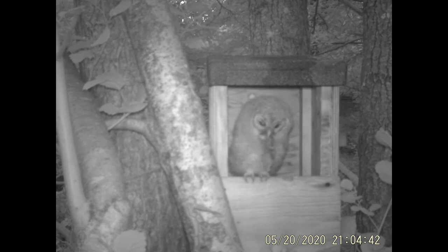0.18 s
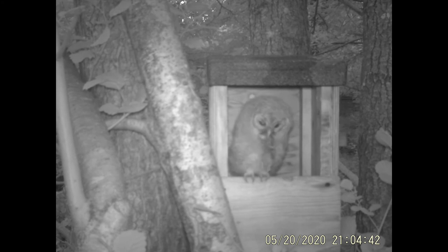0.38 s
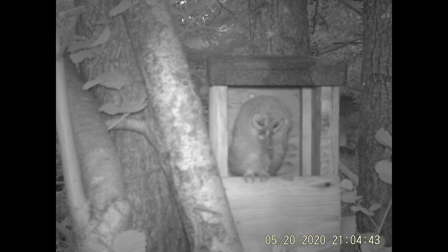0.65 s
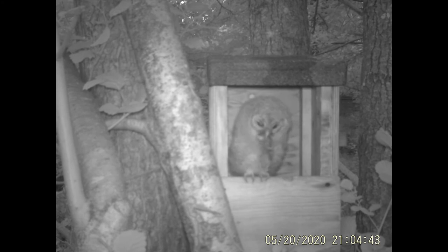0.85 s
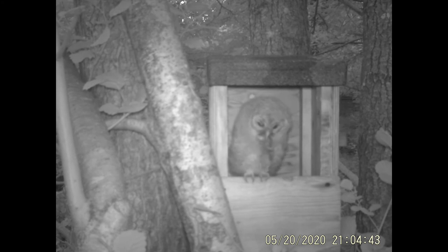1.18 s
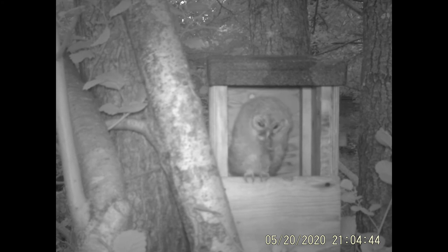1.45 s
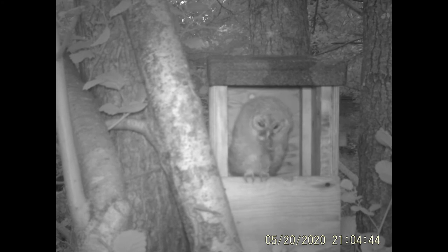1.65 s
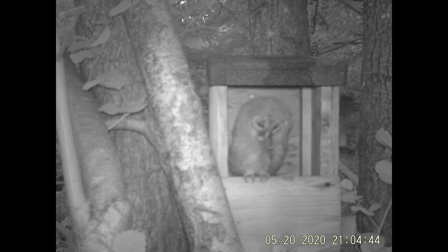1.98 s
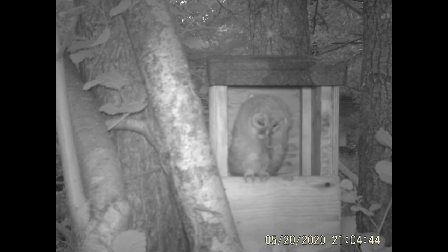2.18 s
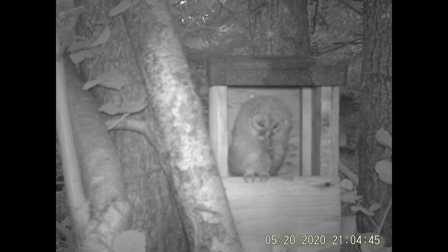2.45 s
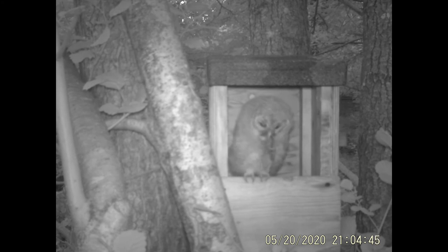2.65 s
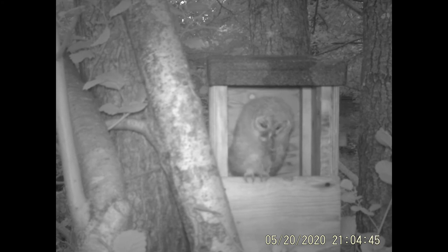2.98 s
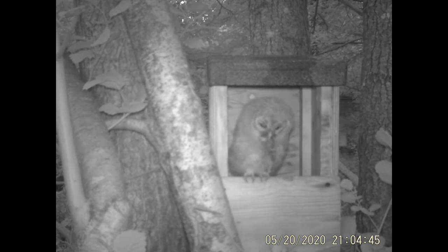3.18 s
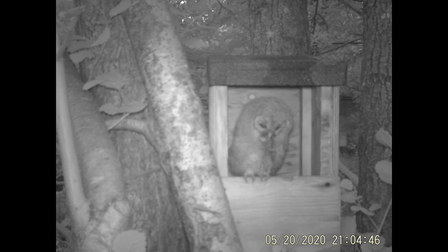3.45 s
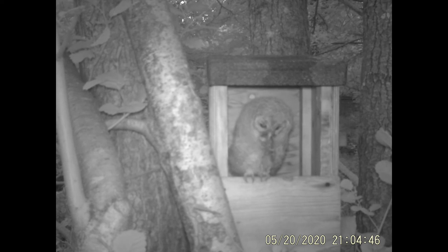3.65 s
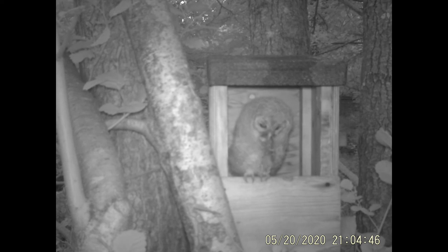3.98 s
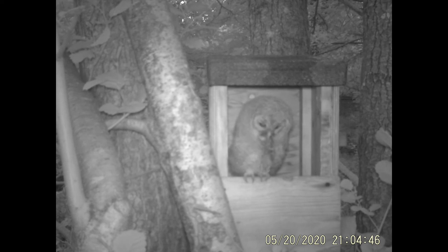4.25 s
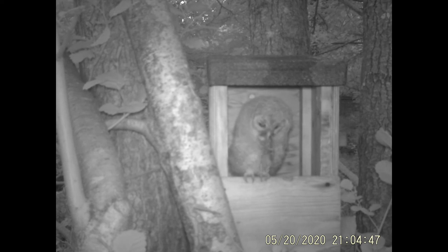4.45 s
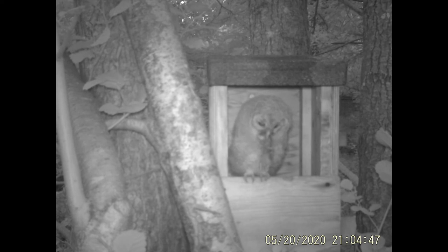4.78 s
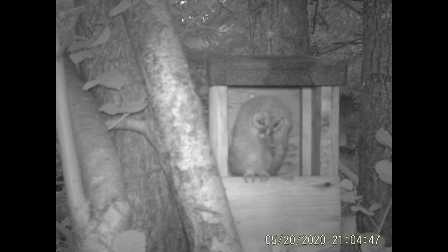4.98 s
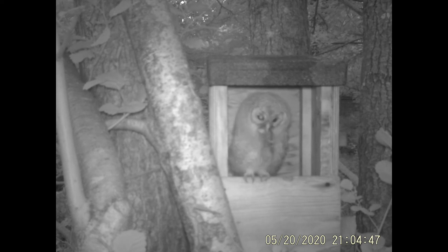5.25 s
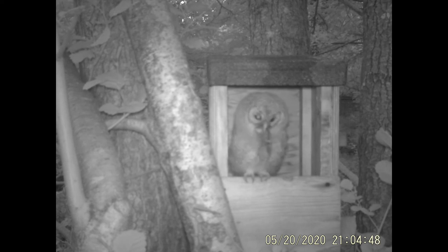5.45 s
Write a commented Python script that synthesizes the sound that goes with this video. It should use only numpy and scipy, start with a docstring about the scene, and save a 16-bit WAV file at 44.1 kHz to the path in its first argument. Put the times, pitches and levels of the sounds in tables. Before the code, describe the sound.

An owl chick begs from a hollow wooden nest box, its shrill, breathy whistles rising, diving and falling into rasp. Four brief calls are spread out by long gaps, some preceded by small squeaks, with low croaky catches in the first and last. Thin distant birdsong follows the first call. A slight woodland echo and constant noisy hiss surround everything, identical on both sides.

```python
"""Night in a wood: steady microphone hiss throughout, the same in both channels.
From the start an owl chick begs in a wooden nest box: short wheezes and squeaks lead into long calls.
Each call is a fluttering whistle, a tone frayed by noise, swooping over rasping filtered noise.
Low notes catch in the first and last calls; after the first, songbirds slide faintly far off.
Resonances and reflections make the box; a diffuse tail makes the wood."""
import sys
import numpy as np
from scipy import signal
from scipy.fft import rfft, irfft, next_fast_len
from scipy.io import wavfile

SR = 44100
rng = np.random.default_rng(int(sys.argv[2]) if len(sys.argv) > 2 else 0)


def pcm_store(signal):
    """Save signal as 16-bit PCM."""
    levels = np.round(np.clip(np.atleast_2d(signal), -1, 1) * 32767)
    wavfile.write(sys.argv[1], SR, levels.astype(np.int16).T)


N = 247401
TIME_S = np.arange(N) / SR

# Microphone hiss spectrum. Each row: frequency in Hz, relative density in dB.
HISS_SPECTRUM = [(15, -15.5), (30, -15.5), (60, -18.5), (120, -21.5), (300, -25), (700, -28.5), (1400, -31),
                 (3000, -34.5), (6000, -37.5), (9000, -40), (13000, -42.5), (15700, -46)]
# Distant songbirds. Each row: start in seconds, length in seconds, start pitch in Hz, end pitch in Hz,
# level in dB before the echo, warble as a share of the pitch.
BIRD_NOTES = [(0.55, .06, 3630, 3640, -63, .02), (0.767, .15, 3820, 3780, -66.5, 0.0083),
              (1.168, .1, 6250, 6560, -67.5, 0.037), (1.23, .12, 6840, 6670, -74, 0.031),
              (1.379, .08, 6740, 6560, -71, .03), (1.563, 0.081, 3800, 3600, -65.5, 0.051),
              (1.621, .09, 3420, 3010, -66, 0.058), (1.73, .06, 2870, 2936, -68, 0.039),
              (1.884, .08, 3230, 3095, -69, 0.042)]
# The voice catches on a low note. Each row: start in seconds, length in seconds, lowest pitch in Hz, level in dB.
LOW_NOTES = [(0.236, .065, 1470, -55.5), (0.353, 0.015, 1430, -55), (4.85, 0.022, 1400, -60.5),
             (5.008, 0.0564, 1435, -54)]
# Overtones of the low note. Each row: multiple of the pitch, level in dB on top of the note's.
LOW_OVERTONES = [(1, 0), (2, -13), (3, -8), (4, -3), (5, 3.5)]
# Hoarse squeaks from the other side of the syrinx. Each row: start in seconds, length in seconds,
# start pitch in Hz, end pitch in Hz, level in dB before the box.
SQUEAKS = [(0.083, 0.027, 3470, 4800, -57), (.209, 0.037, 3504, 5430, -49), (3.452, .045, 4570, 4900, -58),
           (3.556, .135, 4970, 4730, -49.5), (4.968, 0.078, 5360, 4206, -50),
           (5.161, 0.073, 3180, 4930, -50)]
# Begging calls: slide to a notch, climb to a crest, dive to a trough, rebound, drop; a call without slide
# and climb starts on the crest. Each row: start, slide, climb, dive and rebound in seconds, opening, notch,
# crest, trough and rebound pitch in Hz, base levels of whistle and rasp in dB, rasp change on the crest in dB.
BEGGING_CALLS = [ (0.203, 0.034, .097, 0.08, 0.081, 8520, 7050, 8200, 6210, 7400, -37, -51.5, 0),
                 (2.268, 0.025, .096, 0.093, .058, 3500, 6400, 8150, 6246, 7100, -38.5, -50.5, -7.5),
                 (3.556, 0, 0, .064, .040, 8600, 8600, 8540, 6350, 8400, -48, -54.5, 9),
                 (4.959, .045, .111, 0.084, 0.069, 7280, 6400, 8060, 5920, 6800, -38.5, -50, -2.5)]
# Whistle flares up or cracks, rasp goes on. Each row: centre in seconds, half width in seconds, change in dB.
WHISTLE_WOBBLES = [(.457, 0.011, -7.5), (.492, 0.017, 4.5), (.509, .005, -5), (3.594, 0.007, 7),
                   (3.684, 0.0071, -4), (5.008, 0.0099, -17), (5.167, 0.0097, 4.5), (5.2, .013, -13)]
# Short wheezes ahead of a call. Each row: peak in seconds, base levels of whistle and rasp in dB.
SHORT_WHEEZES = [(.102, -53.5, -58), (3.463, -57, -51.5), (4.861, -59.5, -56.5)]
# Throat response to the whistle and its octave; falling through the deep notch, the voice breaks.
# Each row: frequency in Hz, gain in dB.
THROAT_RESPONSE = [(3400, 2.5), (4100, 5), (4550, 0.5), (5350, -14), (5900, 0), (8600, -4.5), (10500, 6),
                   (12400, -7), (13350, 5), (14200, -25)]
# Colour of air rasping through throat and bill. Each row: frequency in Hz, relative gain in dB.
RASP_COLOUR = [(1500, -25), (3000, -9), (3400, -3), (4400, 3), (5300, -2), (6500, 0), (7900, -6),
               (8600, -13), (9500, -20), (12000, -30), (13200, -20), (15000, -44)]
# Hollow resonances of the box. Each row: frequency in Hz, width in Hz, level over the direct sound in dB.
BOX_MODES = [(3820, 85, -8.5), (5120, 74, -15), (5450, 31, 6.5), (5925, 50, 6), (6460, 81, -14),
             (6510, 160, 5.5), (7024, 78, 3.5), (7350, 60, -3), (7800, 190, -0.5), (8050, 51, -25)]

HISS_DB = -54
LOW_BEND_SHARE, LOW_FADE_S = .09, 0.0091   # low notes start and end sharp by this share
SQUEAK_ATTACK_SHARE, SQUEAK_RELEASE_SHARE = 0.25, 0.4   # of the length
SHORT_HZ, SHORT_ATTACK_S, SHORT_RELEASE_S, SHORT_EDGE_DB = 6960, 0.019, .026, -15.5
CLIMB_HASTE, DIVE_HASTE = .85, .75   # exponents; under 1, the steep part comes early
DROP_S, DROP_END_HZ, DROP_HANG = .045, 3492, 1.35   # the hang exponent delays the steepest part
DROP_WHISTLE_DB, DROP_RASP_DB = -4.5, 6   # by the end of the drop, tone has given way to air
OPENING_DB = -3.5   # whistle is softer until the dive
# throat squeeze chokes the whistle around the crest; timing in shares of the climb and of the dive
SQUEEZE_DB, SQUEEZED_BY_SHARE, EASES_FROM_SHARE, OPEN_BY_SHARE = -3.5, 0.33, .05, 0.28
THIN_ABOVE_HZ, THIN_DB_PER_KHZ = 6400, -2   # whistle thins when forced high
RASP_PIVOT_HZ, RASP_DB_PER_KHZ = 6530, -0.6   # more air escapes at low pitch
ATTACK_S, RASP_ATTACK_S, RELEASE_S = 0.021, 0.031, 0.025
CUTOFF_HZ, OFFSET = 15720, .0062


def from_db(db):
    """Decibels to amplitude."""
    return 10 ** (np.asarray(db) / 20)


def rms_one(x):
    """Scale to rms 1."""
    return x / np.sqrt(np.mean(x ** 2) + 1e-20)


def colour(x, spectrum):
    """Filter by a response joined in dB over log frequency."""
    hz, db = np.transpose(spectrum)
    size = next_fast_len(N)
    bins_hz = np.maximum(np.fft.rfftfreq(size, 1 / SR), 1)
    gain = from_db(np.interp(np.log(bins_hz), np.log(hz), db))
    return irfft(rfft(x, size) * gain, size)[:N]


def flutter(rate_hz):
    """Random motion up to about the given rate; rms 1."""
    low_pass = signal.butter(2, rate_hz, fs=SR, output="sos")
    return rms_one(signal.sosfilt(low_pass, rng.standard_normal(N)))


def phase_of(hz):
    """Phase in radians, summed from a pitch curve."""
    return 2 * np.pi * np.cumsum(hz) / SR


def hoarse_tone(phase, width_hz):
    """Narrow noise around a moving pitch, like turbulence in a resonance; rms about 1."""
    return flutter(width_hz) * np.sin(phase) + flutter(width_hz) * np.cos(phase)


def scatter(x, t60_s):
    """Many small reflections: a diffuse, dying tail of unit energy."""
    tail = rng.standard_normal(SR) * np.exp(-np.log(1000) * TIME_S[:SR] / t60_s)
    return signal.fftconvolve(x, tail / np.linalg.norm(tail))[:N]


def glide(rows, column):
    """One column of a curve, joined by straight lines in time."""
    rows = np.array(rows)
    return np.interp(TIME_S, rows[:, 0], rows[:, column])


def gate(start_s, end_s, fade_s=0.0021):
    """Open from start to end, with short ramps outside."""
    return np.clip(1 + np.minimum(TIME_S - start_s, end_s - TIME_S) / fade_s, 0, 1)


def controls(curves, db_columns):
    """Pitch, then the gain of each dB column, through a series of curves; silent between them."""
    pitch_hz = glide(sorted(row for curve in curves for row in curve), 1)
    gains = [sum(gate(curve[0][0], curve[-1][0]) * from_db(glide(curve, column)) for curve in curves)
             for column in db_columns]
    return pitch_hz, *gains


def fade_db(t_s, attack_s, release_s):
    """Attack, hold and release in dB, linear in amplitude above a floor."""
    ramp = np.minimum((t_s - t_s[0]) / attack_s, (t_s[-1] - t_s) / release_s)
    return 20 * np.log10(np.clip(ramp, .03, 1))


def swoop(share):
    """A smooth cosine move from 0 to 1."""
    return (1 - np.cos(np.pi * share)) / 2


def microphone_hiss():
    """Steady noise coloured by the hiss spectrum."""
    return from_db(HISS_DB) * rms_one(colour(rng.standard_normal(N), HISS_SPECTRUM))


def songbirds(warble_hz=120, echo_db=0.5):
    """Thin sine slides with random warble, half lost in the echo of the wood."""
    notes = [[(start_s, start_hz, db, warble), (start_s + length_s, end_hz, db, warble)]
             for start_s, length_s, start_hz, end_hz, db, warble in BIRD_NOTES]
    warble_share = glide(sorted(row for note in notes for row in note), 3)
    pitch_hz, gain = controls(notes, (2,))
    song = gain * np.sin(phase_of(pitch_hz * (1 + warble_share * flutter(warble_hz))))
    return song + from_db(echo_db) * scatter(song, t60_s=1.0)


def low_note(start_s, length_s, lowest_hz, db):
    """A note that sags in the middle, as rows of s, pitch Hz, dB."""
    t_s = np.linspace(start_s, start_s + length_s)
    pitch_hz = lowest_hz * (1 + LOW_BEND_SHARE * np.linspace(-1, 1) ** 2)
    return list(zip(t_s, pitch_hz, db + fade_db(t_s, LOW_FADE_S, LOW_FADE_S)))


def low_notes(jitter_share=0.01, jitter_hz=600):
    """The syrinx briefly vibrates slowly; the throat lifts the upper overtones."""
    pitch_hz, gain = controls([low_note(*row) for row in LOW_NOTES], (2,))
    phase = phase_of(pitch_hz * (1 + jitter_share * flutter(jitter_hz)))
    overtones = sum(from_db(db) * np.sin(round(multiple) * phase) for multiple, db in LOW_OVERTONES)
    return gain * np.sqrt(2) * overtones


def squeak(start_s, length_s, start_hz, end_hz, db):
    """A straight slide that swells and fades, as rows of s, pitch Hz, dB."""
    t_s = np.linspace(start_s, start_s + length_s)
    level_db = db + fade_db(t_s, SQUEAK_ATTACK_SHARE * length_s, SQUEAK_RELEASE_SHARE * length_s)
    return list(zip(t_s, np.linspace(start_hz, end_hz), level_db))


def squeaks(width_hz=250):
    """A second, always hoarse voice: narrow noise on sliding pitches."""
    pitch_hz, gain = controls([squeak(*row) for row in SQUEAKS], (2,))
    return gain * hoarse_tone(phase_of(pitch_hz), width_hz)


def short_wheeze(peak_s, whistle_db, rasp_db):
    """A quick swell and fade on one pitch, as rows of s, pitch Hz, whistle dB, rasp dB."""
    shape = [(-SHORT_ATTACK_S, SHORT_EDGE_DB), (0, 0), (SHORT_RELEASE_S, SHORT_EDGE_DB)]
    return [(peak_s + s, SHORT_HZ, whistle_db + db, rasp_db + db) for s, db in shape]


def begging_call(start_s, slide_s, climb_s, dive_s, rebound_s, opening_hz, notch_hz, crest_hz, trough_hz,
                 rebound_hz, whistle_db, rasp_db, crest_rasp_db):
    """Rows of s, pitch Hz, whistle dB, rasp dB: throat squeezed on the crest, opening in the dive."""
    turns_s = start_s + np.cumsum([0, slide_s, climb_s, dive_s, rebound_s, DROP_S])
    t_s = np.linspace(start_s, turns_s[-1], num=300)
    # progress through each leg, 0 to 1
    slide, climb, dive, rebound, drop = (np.interp(t_s, leg, [0, 1]) for leg in zip(turns_s, turns_s[1:]))
    pitch_hz = (opening_hz
                + (notch_hz - opening_hz) * slide ** 2
                + (crest_hz - notch_hz) * np.sin(np.pi / 2 * climb ** CLIMB_HASTE)
                + (trough_hz - crest_hz) * swoop(dive ** DIVE_HASTE)
                + (rebound_hz - trough_hz) * swoop(rebound)
                + (DROP_END_HZ - rebound_hz) * swoop(drop ** DROP_HANG))

    squeezing = np.interp(climb, [0, SQUEEZED_BY_SHARE], [0, 1])
    squeeze = squeezing * np.interp(dive, [EASES_FROM_SHARE, OPEN_BY_SHARE], [1, 0])
    thinning_db = THIN_DB_PER_KHZ * np.maximum(pitch_hz - THIN_ABOVE_HZ, 0) / 1000
    escaping_db = RASP_DB_PER_KHZ * (pitch_hz - RASP_PIVOT_HZ) / 1000
    wobble_db = sum(db * np.exp(-((t_s - s) / width_s) ** 2) for s, width_s, db in WHISTLE_WOBBLES)

    tone_db = (whistle_db + OPENING_DB * (1 - swoop(dive)) + SQUEEZE_DB * squeeze + DROP_WHISTLE_DB * drop
               + thinning_db + wobble_db + fade_db(t_s, ATTACK_S, RELEASE_S))
    air_db = (rasp_db + crest_rasp_db * squeeze + DROP_RASP_DB * drop
              + escaping_db + fade_db(t_s, RASP_ATTACK_S, RELEASE_S))
    return list(zip(t_s, pitch_hz, tone_db, air_db))


def rasp(pitch_hz, spacing_hz=1520, band_width_hz=200, band_db=-9, patchy_db=1.0, patchy_hz=70,
         grain_db=2.1, grain_hz=700):
    """Turbulent air in restless patches, with a hoarse band on either side of the whistle."""
    air = np.zeros(N)
    edges_hz = np.geomspace(1500, 15000, num=17)
    for band_hz in zip(edges_hz, edges_hz[1:]):
        band_pass = signal.butter(2, band_hz, "band", fs=SR, output="sos")
        patch = signal.sosfilt(band_pass, rng.standard_normal(N))
        air += patch * from_db(patchy_db * flutter(patchy_hz))
    # slow vibration of the syrinx beats with the whistle
    side_bands = sum(hoarse_tone(phase_of(pitch_hz + side * spacing_hz), band_width_hz) for side in (-1, 1))
    breath = colour(rms_one(air) + from_db(band_db) * rms_one(side_bands), RASP_COLOUR)
    return rms_one(breath * from_db(grain_db * flutter(grain_hz)))


def whistle(pitch_hz, hoarseness, jitter_share=0.0066, jitter_hz=600, shake_db=3.0, shake_hz=220,
            fray_share=0.0126, hoarse_width_hz=280, octave_db=-26):
    """A tone whose pitch and strength shake in the air stream, fraying into narrow noise when hoarse."""
    spread = jitter_share + fray_share * hoarseness
    phase = phase_of(pitch_hz * (1 + spread * flutter(jitter_hz)))
    clear = rms_one(np.sin(phase) * from_db(shake_db * flutter(shake_hz)))
    frayed = hoarse_tone(phase, hoarse_width_hz)
    tone = np.sqrt(1 - hoarseness) * clear + np.sqrt(hoarseness) * frayed
    return tone + from_db(octave_db) * hoarse_tone(2 * phase, hoarse_width_hz)


def wheezes(rasp_trim_db=1.5, fraying=1.4, strain_hz=7400, slack_hz=5950, strain_span_hz=500):
    """Whistle over rasp; it turns hoarse when much air escapes or the pitch is strained or slack."""
    calls = [begging_call(*row) for row in BEGGING_CALLS] + [short_wheeze(*row) for row in SHORT_WHEEZES]
    pitch_hz, whistle_gain, rasp_gain = controls(calls, (2, 3))
    rasp_share = rasp_gain ** 2 / (rasp_gain ** 2 + whistle_gain ** 2 + 1e-20)
    excess_hz = np.maximum(pitch_hz - strain_hz, 0) + np.maximum(slack_hz - pitch_hz, 0)
    hoarseness = np.clip(fraying * rasp_share + excess_hz / strain_span_hz, 0, 1)
    tone = colour(whistle_gain * whistle(pitch_hz, hoarseness), THROAT_RESPONSE)
    return tone + from_db(rasp_trim_db) * rasp_gain * rasp(pitch_hz)


def nest_box(x, level_db=-3.0, boards_db=-13):
    """The box rings and its boards reflect, so a gliding tone swells and dips."""
    rung = x.copy()
    for hz, width_hz, db in BOX_MODES:
        rung += from_db(db) * signal.lfilter(*signal.iirpeak(hz, hz / width_hz, fs=SR), x)
    return from_db(level_db) * (rung + from_db(boards_db) * scatter(rung, t60_s=0.044))


def scene(trees_db=-22):
    """Chick close by, its echo in the wood, birds far off and hiss, alike in both channels."""
    chick = nest_box(wheezes() + squeaks()) + low_notes()   # low notes bypass the box
    wood = from_db(trees_db) * scatter(chick, t60_s=0.51) + songbirds()
    mono = chick + wood + microphone_hiss()
    return np.array([mono, mono])


def record(dry):
    """A steep low-pass cuts the top; the input rests slightly above zero."""
    low_pass = signal.firwin(1601, CUTOFF_HZ, fs=SR)
    return signal.fftconvolve(dry, low_pass[None], mode="same", axes=1) + OFFSET


dry = scene()
out = record(dry)
pcm_store(out)
```